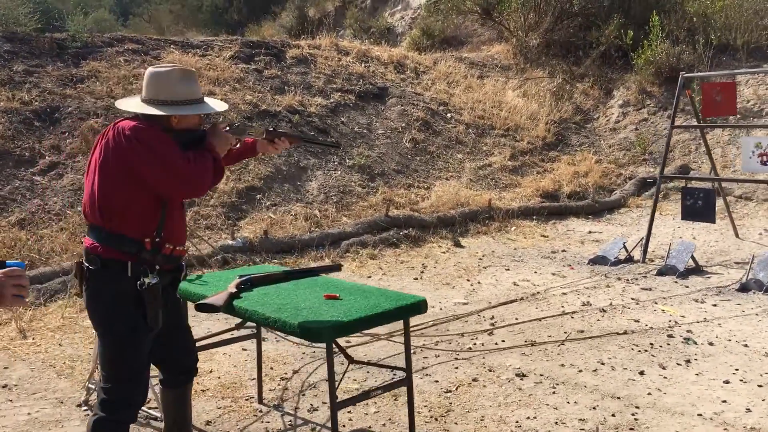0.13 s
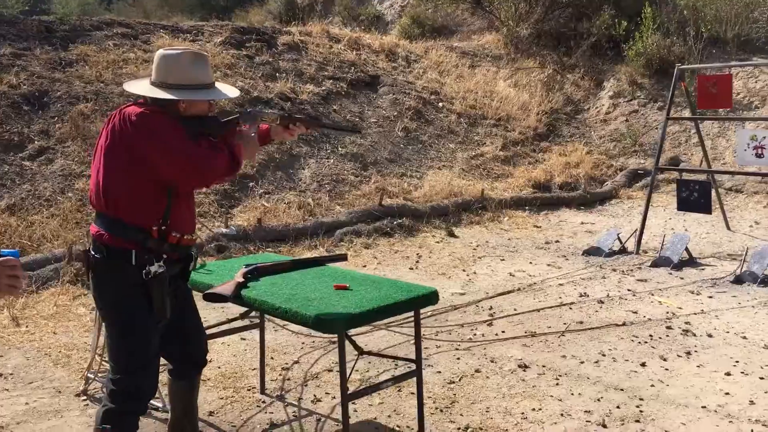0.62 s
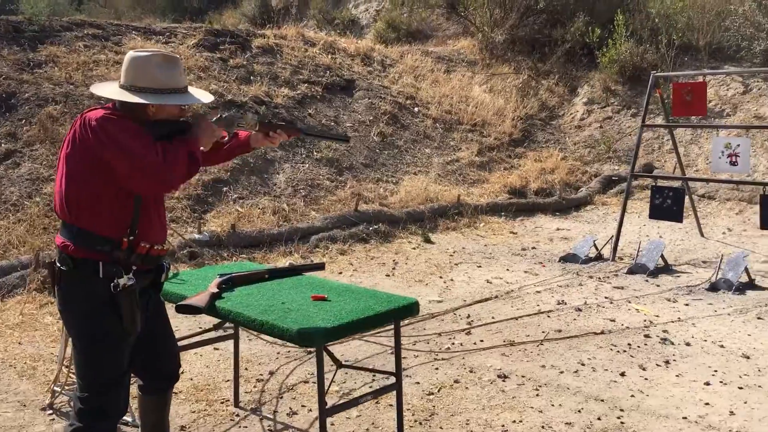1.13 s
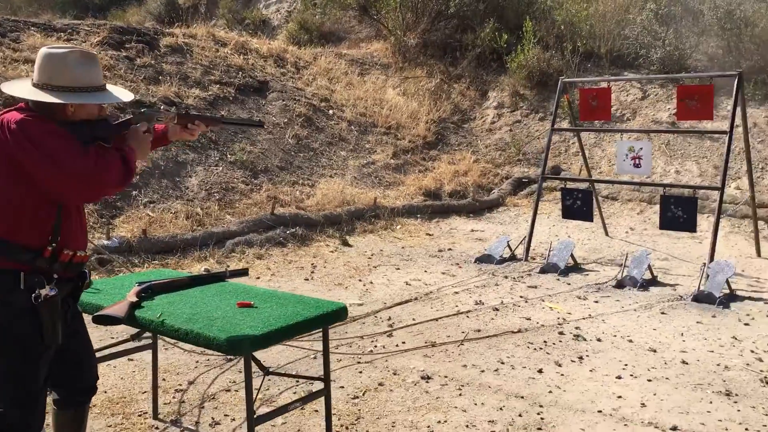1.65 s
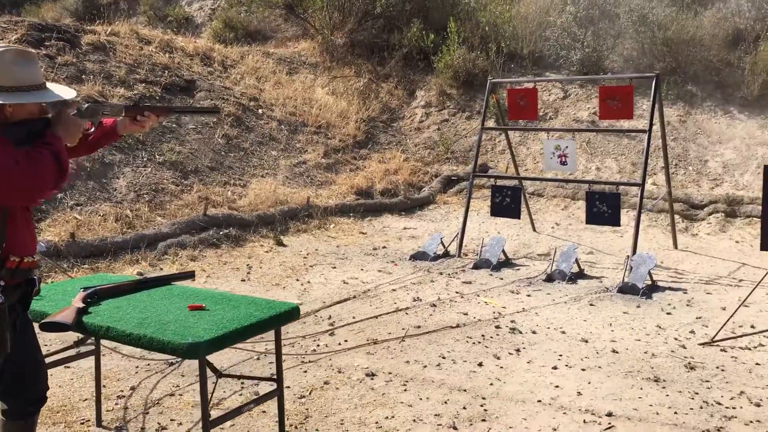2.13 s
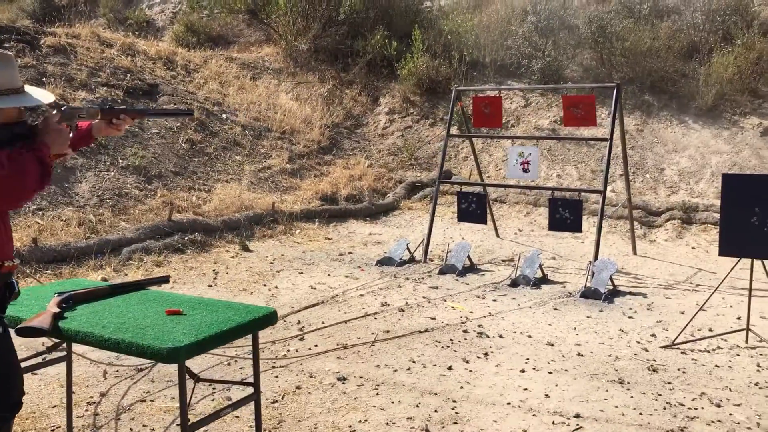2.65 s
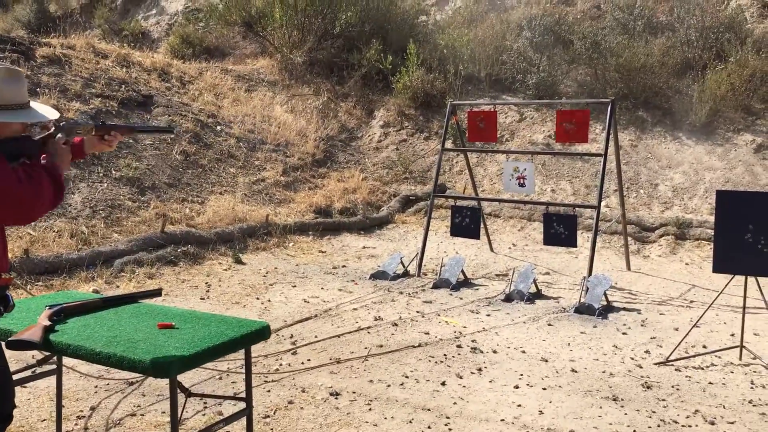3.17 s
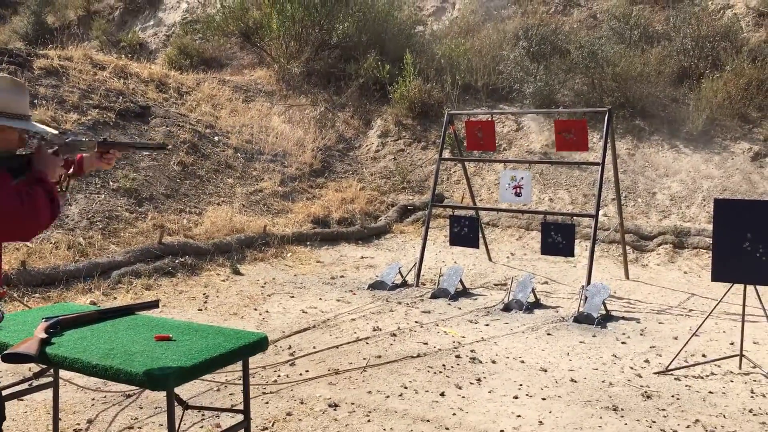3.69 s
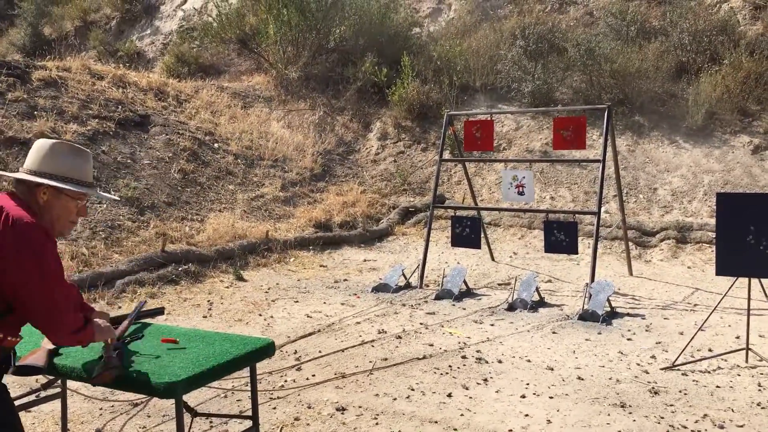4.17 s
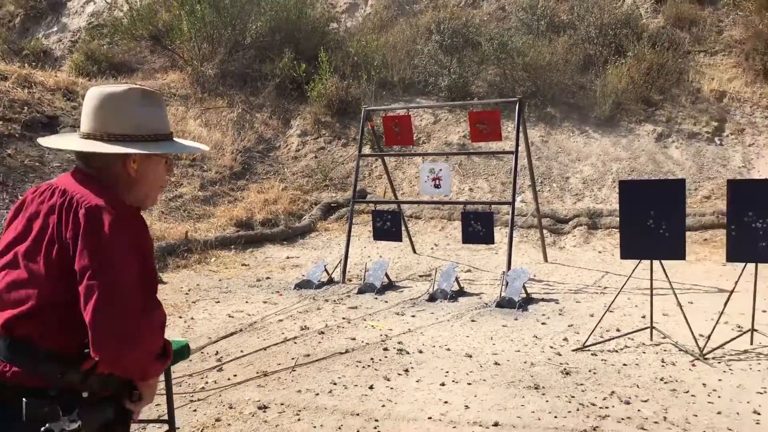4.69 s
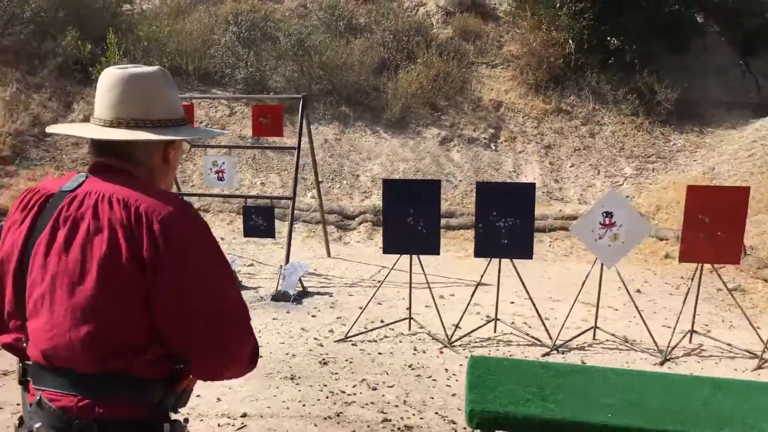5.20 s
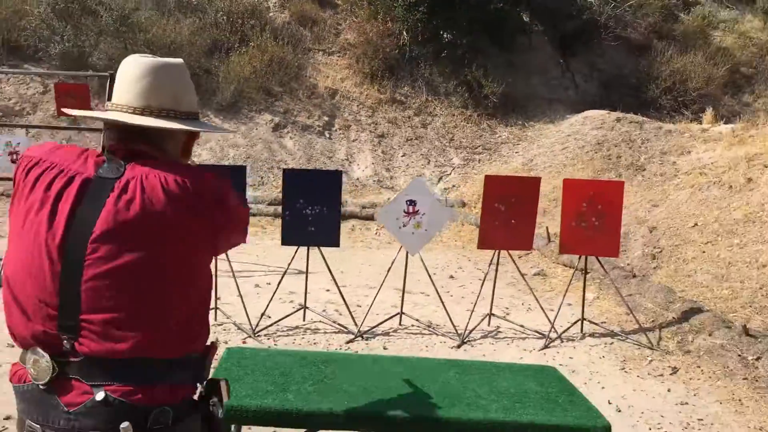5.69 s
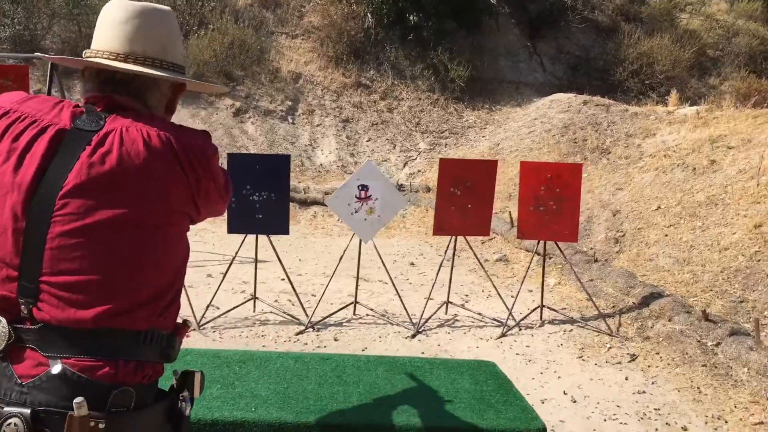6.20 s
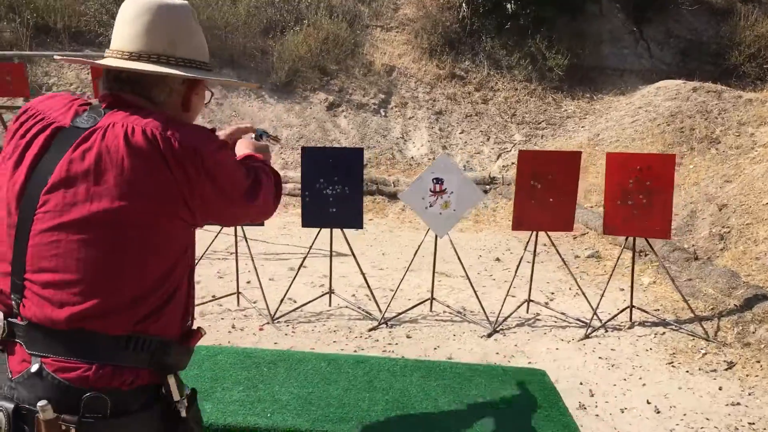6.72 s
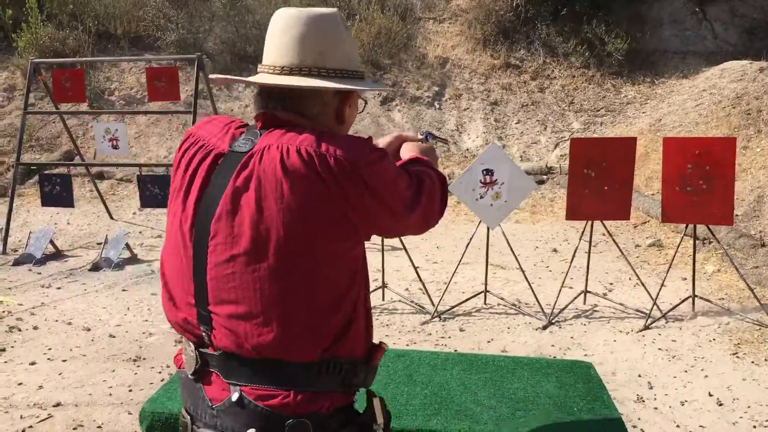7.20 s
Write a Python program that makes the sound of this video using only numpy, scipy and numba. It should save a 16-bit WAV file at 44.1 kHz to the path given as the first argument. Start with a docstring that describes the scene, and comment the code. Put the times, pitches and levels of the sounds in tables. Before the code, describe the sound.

At an open range, fast rifle bangs and metallic clangs give way to a gun set down, gear clinks, and five sharp revolver shots.

```python
"""Ten quick lever-rifle shots crack out, the rifle thumps down on a table, then a revolver fires five.
Most shots are answered by clanging steel plates, nearer ones for the revolver: decaying modes and a noise splatter.
Each blast is a sharp front and a low swing, slapped back by table, ground and earth banks as bursts of noise and tone.
Between them: filtered steel rattles, knocks, chinks, cloth, and light wind as coloured noise on the microphone.
The microphone's gain control ducks under every bang and creeps back."""
import sys
import numpy as np
from scipy import signal
from scipy.fft import rfft, irfft, next_fast_len
from scipy.io import wavfile
from scipy.ndimage import uniform_filter1d, minimum_filter1d, map_coordinates
from numba import njit

SR = 44100
rng = np.random.default_rng(int(sys.argv[2]) if len(sys.argv) > 2 else 0)


def ratio_of_db(decibels):
    """Turn decibels (scalar or array-like) into linear amplitude factors; 0 dB maps to 1."""
    return 10 ** (np.asarray(decibels, float) / 20)


def transcribe(signal):
    """Save signal, clipped to [-1, 1], as a 16-bit WAV file at the path in sys.argv[1]."""
    frames = np.atleast_2d(signal).T
    limited = np.clip(frames, -1, 1)
    pcm = np.round(limited * 32767).astype(np.int16)
    wavfile.write(sys.argv[1], SR, pcm)


N = 323683

# wind on the microphone: t/s, level/dB
WIND_LEVEL = [(0, -31), (.25, -35), (.5, -56), (2.1, -50), (2.65, -28.5), (2.9, -60), (3.9, -46.5),
              (4.9, -39), (5.08, -31), (5.4, -42)]
# colour of the buffeting: f/Hz, relative level/dB per Hz
WIND_COLOUR = [(20, -2.5), (65, 9), (265, -4), (500, -28.5)]
# colour of grit, cloth and outdoor hiss: f/Hz, relative level/dB per Hz
GRIT_COLOUR = [(180, -55), (280, 0), (480, -9), (1300, -11), (3520, -13), (15900, -27)]
# cloth and steps: t/s, level/dB
RUSTLE_LEVEL = [(4.2, -59), (4.35, -38), (4.7, -52.5), (6.05, -49), (6.2, -63)]
# rifle on the table, steps and belt gear: t/s, relative level/dB, knock f/Hz, t60/s
GEAR_KNOCKS = [(4.2329, -1, 220, 0.061), (4.237, -19, 2640, 0.37), (4.262, -18.5, 250, 0.57),
               (4.493, -24.5, 2560, 0.12), (4.587, -22.5, 960, 0.14), (4.783, -24, 230, 0.11),
               (4.893, -27.5, 1180, 0.036), (1.192, -26, 693, .06), (5.125, -29.5, 895, 0.038),
               (5.291, -33.5, 1440, 0.28), (5.3, -18, 3300, 0.017), (5.317, -29, 790, 0.22),
               (5.609, -24, 3670, 0.023), (5.622, -25.5, 5330, 0.1), (5.655, -18.5, 246, 0.054),
               (6.008, -32, 2050, 0.55), (6.044, -30.5, 2700, 0.5)]
# buckles and cartridges: t/s, level/dB, ring f/Hz
METAL_CHINKS = [(4.15, -29.5, 900), (4.195, -35.5, 3240), (4.798, -27, 4460), (4.8585, -23.5, 4310),
                (4.989, -41.5, 10900), (5.0215, -29, 9530), (5.2364, -23.5, 4310), (5.4057, -22.5, 11220),
                (5.5153, -29, 1510)]
# lever, hammer and cases: t/s, relative level/dB
ACTION_CLICKS = [(0.0973, -20.5), (0.129, -10.5), (0.167, -10.5), (0.198, -15.5), (0.236, -33),
                 (0.852, -25), (0.3001, -23.5), (0.8822, -16.5), (0.9255, -21.5), (1.6027, -21),
                 (1.6324, -25.5), (2.228, -20), (2.2633, -20), (3.0023, -23.5), (3.4459, -15.5),
                 (3.46, -11), (7.222, -35)]
# resonances of the rifle's steel: f/Hz, width/Hz, relative level/dB
RECEIVER_MODES = [(2300, 1400, -13), (6670, 350, -2.5), (7300, 76, -8)]
# modes of each plate: f/Hz, then nominal level/dB a tenth of a second after each strike in turn
# (every point of impact favours other modes)
PLATE_MODES = { "a": [(424, -36, -46), (1165, -39.5, -24.5), (1930, -43, -40.5), (2840, -41.5, -33),
               (3090, -25, -22.5), (3962, -23.5, -15), (5200, -35, -32.5), (6550, -44, -25)],
               "b": [(1186, -27.5, -33), (3140, -34.5, -38.5), (3973, -34, -23.5)], "c": [(1152, -38, -35),
               (3978, -39, -33.5), (5120, -45, -50.5), (5400, -41.5, -34.5), (8270, -47.5, -31.5),
               (11719, -48.5, -67.5)], "d": [(1168, -22, -36.5), (2000, -51, -36.5), (2512, -41, -34.5),
               (2740, -42, -46), (4000, -38.5, -32), (6660, -41.5, -36), (9940, -41.5, -47.5)],
               "e": [(1190, -41, ), (3962, -21.5, ), (7558, -43.5, ), (8333, -39, )], "f": [(604, -17.5),
               (709, -31.5), (870, -27.5), (1027, -31), (1252, -27), (1965, -26.5), (2238, -28),
               (2501, -18), (3276, -23), (4469, -22.5), (4817, -20), (5354, -19), (5582, -23.5),
               (6044, -23), (6259, -13.5), (7531, -18), (8340, -16.5)], "g": [(598, -27.5), (1382, -39.5),
               (2242, -34.5), (2840, -29), (3884, -48.5), (5122, -28), (6037, -31), (6382, -42),
               (7934, -32), (8236, -21.5), (9134, -25.5), (10075, -28), (11637, -30), (13021, -40),
               (14503, -34)], "h": [(597.5, -31), (748.3, -37.5), (1233, -29), (1346, -38.5), (3801, -36.5),
               (6282, -40.5)]}
# plate modes that hang on far longer than the rest: f/Hz, t60/s
LASTING_MODES = [(1189, 1.07), (2508, 0.77), (3970, 0.75)]
# bullet strikes: t/s, plate, splatter relative level/dB, low swing level/dB
BULLET_STRIKES = [(0.3671, "a", -0.5, -15), (0.6289, "a", -4.5, -12.5), (1.0395, "b", -0.5, 7.5),
                  (1.2957, "b", -1.5, -29), (1.6955, "c", -1, 10), (1.969, "c", 2.5, -18),
                  (2.4568, "d", -5.5, -1.5), (2.7225, "d", -5.5, 1), (3.5593, "e", 1.5, 9),
                  (6.122, "f", 10, 0), (6.662, "g", 0.5, 11), (7.014, "h", -3, -10)]
# colour of the dull return: f/Hz, relative level/dB per Hz
DULL_COLOUR = [(150, -26.5), (520, 0), (1030, -6.5), (5000, -16.5), (9000, -60)]
# colour of the bright return: f/Hz, relative level/dB per Hz
BRIGHT_COLOUR = [(880, 4.5), (1500, -3), (5660, 0.5), (15100, -9), (15900, -21.5)]
# single slaps from surfaces near the rifle: delay after the shot t/s, level/dB relative to the blast,
# nominal f/Hz, time to peak t/s, relative width (also the share of noise against tone)
RIFLE_ECHOES = [(.0038, -5.5, 2500, .0005, .7), (.0205, 2, 800, 0.0011, 0.96),
                (0.0304, 5, 1013, 0.0017, 0.74)]
# the same for the revolver: delay t/s, relative level/dB, nominal f/Hz, time to peak t/s, relative width
REVOLVER_ECHOES = [(.005, 1.2, 1606, .004, 1), (.021, 5.3, 890, 0.0024, 1)]
# rifle shots: t/s, low swing level/dB, swing stretch (factor on its time)
RIFLE_SHOTS = [(.3198, 10.5, 1.3), (.5847, 8.5, 1.04), (.9997, 0.5, 1.04), (1.2527, 13.5, 0.5),
               (1.6567, 13, 1.04), (1.9266, 10, 0.56), (2.415, 11, 1.25), (2.6789, 12, 0.95),
               (3.1818, 9.5, 1.25), (3.516, 10.5, 1.22)]
# revolver shots: t/s, low swing level/dB, swing stretch (factor on its time)
REVOLVER_SHOTS = [(6.0927, 14.8, 0.48), (6.2483, 12.2, 0.92), (6.6329, 14, 0.6), (6.9846, 12.4, 0.44),
                  (7.3288, 4.8, 0.55)]
PAIRED_SHOTS = RIFLE_SHOTS[1:8:2]  # the quick second shot of each pair


def unit(x):
    """Scaled to rms 1."""
    return x / np.sqrt(np.mean(x ** 2) + 1e-20)


def noise(points, size):
    """Noise of rms 1 coloured by (Hz, dB) points on a log frequency axis."""
    hz, db = np.transpose(points)
    padded = next_fast_len(size)
    log_hz = np.log(np.fft.rfftfreq(padded, 1 / SR) + 1)
    gain = ratio_of_db(np.interp(log_hz, np.log(hz), db, -120, -120))
    return unit(irfft(rfft(rng.standard_normal(padded)) * gain, padded)[:size])


def band(size, hz, width):
    """Noise of rms 1 around one frequency, with a relative width."""
    points = [(hz / 8, -60), (hz / (1 + width), -9), (hz, 0), (hz * (1 + width), -9), (hz * 8, -45)]
    return noise(points, size)


def curve(rows):
    """(s, dB) rows as one dB value per sample."""
    s, db = np.transpose(rows)
    return np.interp(np.arange(N) / SR, s, db, -120, db[-1])


def wobble(rate, size=N):
    """A smooth random curve, rate knots a second."""
    knots = rng.standard_normal(int(size * rate / SR) + 4)
    return map_coordinates(knots, [np.arange(size) * rate / SR])


def add(out, s, x):
    """Mixes x into out from time s."""
    i = round(s * SR)
    out[i:i + len(x)] += x[:max(len(out) - i, 0)]


def wind():
    """Lumpy buffeting on the microphone port over a faint outdoor hiss."""
    lumps = ratio_of_db(6 * wobble(13))
    buffeting = unit(lumps * noise(WIND_COLOUR, N))
    hiss = ratio_of_db(-56.0 + 2.0 * wobble(1.2)) * noise(GRIT_COLOUR, N)
    return ratio_of_db(curve(WIND_LEVEL)) * buffeting + hiss


def rustle():
    """Cloth and steps: flickering gritty noise over a hollow low undertone."""
    cloth = unit(ratio_of_db(3 * wobble(25) + 6 * wobble(300)) * noise(GRIT_COLOUR, N))
    rumble = ratio_of_db(-4.5 + 5.7 * wobble(13)) * band(N, 260, width=0.27)
    return ratio_of_db(curve(RUSTLE_LEVEL)) * (cloth + rumble)


def gear():
    """Contacts knock at their own pitch over a gritty scrape; small metal parts clatter as short rings."""
    out, t = np.zeros(N), np.arange(SR // 3) / SR
    for s, db, hz, t60 in GEAR_KNOCKS:
        uneven = ratio_of_db(3.5 * wobble(250, len(t)))
        if hz < 250:  # the table top and boots thump on one low note
            knock = 2 * np.sin(2 * np.pi * hz * t)
        else:
            knock = band(len(t), hz, width=0.99)
        envelope = ratio_of_db(db - 60 * t / t60) * (1 - np.exp(-t * hz)) * uneven
        add(out, s, envelope * (ratio_of_db(-5.5) * knock + ratio_of_db(-8.5) * noise(GRIT_COLOUR, len(t))))
    for s, db, hz in METAL_CHINKS:
        ring = np.sin(2 * np.pi * hz * t) + ratio_of_db(-7) * band(len(t), hz, width=0.74)
        add(out, s, ratio_of_db(db - 60 * t / 0.024) * ring)
    return out


def action():
    """Short bursts of noise rattle the rifle's steel through the resonances of the receiver."""
    rattle, t = np.zeros(N), np.arange(SR // 5) / SR
    # the lever slams shut 23 ms before the second shot of each pair
    slams = [(shot[0] - 0.023, -11.5) for shot in PAIRED_SHOTS]
    for s, db in ACTION_CLICKS + slams:
        envelope = ratio_of_db(db - 60 * t / 0.086) * (1 - np.exp(-t / 0.0002))
        add(rattle, s, envelope * rng.standard_normal(len(t)))
    f = np.fft.rfftfreq(N, 1 / SR)
    steel = 0.15
    for k, (hz, width, db) in enumerate(RECEIVER_MODES):
        resonance = 1j * f * width / (hz * hz - f * f + 1j * f * width)
        steel = steel + (-1) ** k * ratio_of_db(db) * resonance
    tilt = f / (f + 900) * (f < 15900)
    return ratio_of_db(9.5) * irfft(rfft(rattle) * steel * tilt, N)


def swing(t, stretch):
    """The diaphragm overshoots: a swing that slows from a snap down to a low thump."""
    u = t / stretch
    cycles = 47 * u + 0.36 * np.log(1 + u / 0.00064)
    return np.sin(2 * np.pi * cycles) * (1.3 - np.exp(-u / 0.0052)) * np.exp(-u / 0.011)


def plate_ring(t, plate, visit, splat_db):
    """A struck plate rings in decaying modes, each at a slightly new strength."""
    hz, *by_strike = np.transpose(PLATE_MODES[plate])[..., None]
    level_db = by_strike[visit]
    # many weaker modes ring too, others at each point of impact
    weak = rng.random((2, 48, 1))
    top_db, spread_db = (-34, 6) if plate in "fg" else (-45, 22)
    hz = np.vstack([hz, 1000 + 14000 * weak[0]])
    level_db = np.vstack([level_db, top_db - spread_db * weak[0] - 10 * weak[1]])
    # high modes radiate their energy sooner
    t60_1khz, slope = (2.6, -.8) if plate in "fgh" else (.6, -.55)  # the nearer plates are f, g, h
    t60 = t60_1khz * (hz / 1000) ** slope
    # a weak share of each mode fades 16 times slower
    linger = ratio_of_db(-30.5 - 60 * t / (16 * t60))
    for tone_hz, lasting in LASTING_MODES:
        t60 = np.where(abs(hz / tone_hz - 1) < .004, lasting, t60)
    luck = rng.standard_normal((4, len(hz), 1))
    # nearly square plates split each mode into a close pair, which beats
    beat = 1 + .3 * np.cos(2 * np.pi * (5 * luck[2] * t + luck[3]))
    # the treble is fiercest around the fresh dent
    flash_db = 1.24 * min(ratio_of_db(splat_db), 1) * hz / 1000 * np.exp(-t / 0.037)
    fade = ratio_of_db(flash_db - 60 * (t - .1) / t60) + linger
    tones = np.sin(2 * np.pi * hz * t + 3 * luck[1])
    ring = (ratio_of_db(level_db + 1.5 * luck[0]) * fade * beat * tones).sum(axis=0)
    return ring * (1 - np.exp(-t / 0.0022))


def plates():
    """Each bullet splatters as bright noise, swings the diaphragm and sets the plate ringing."""
    out, t = np.zeros(N), np.arange(int(1.5 * SR)) / SR
    struck = []
    for s, plate, splat_db, swing_db in BULLET_STRIKES:
        ring = plate_ring(t, plate, struck.count(plate), splat_db)
        struck.append(plate)
        splat = (ratio_of_db(5 - 60 * t / 0.09) + ratio_of_db(-0.5 - 60 * t / 0.014)) * noise(BRIGHT_COLOUR, len(t))
        add(out, s, ring + ratio_of_db(splat_db) * splat + ratio_of_db(swing_db) * swing(t, 0.85))
    return out


def scatter(t, near_db, near_t60, bank_db, valley_db, valley_t60, far_db):
    """Envelope of the return: fast decay off close ground, a shelf that ends with the far bank, a valley tail."""
    bank_end = 1 + np.exp(np.clip((t - .14) / 0.0076, -50, 50))
    shelf = ratio_of_db(bank_db - 44.5 * t) / bank_end
    far = shelf + ratio_of_db(valley_db - 60 * t / valley_t60)
    return ratio_of_db(near_db - 60 * t / near_t60) + ratio_of_db(far_db) * far


def blast(t, far_db):
    """Sharp pressure front, then its scattered return as dull and bright noise."""
    # rocks and scrub return the bang in lumps
    uneven = ratio_of_db(3 * wobble(90, len(t)) + 4.5 * wobble(900, len(t)))
    front = (1 - t / 0.00028) * np.exp(-t / 0.0001)
    dull = scatter(t, near_db=-1, near_t60=0.15, bank_db=-26, valley_db=-52, valley_t60=2.5, far_db=far_db)
    bright = scatter(t, near_db=-1.5, near_t60=0.11, bank_db=-20.5, valley_db=-30, valley_t60=0.85,
                     far_db=far_db)
    return front + uneven * (dull * noise(DULL_COLOUR, len(t)) + bright * noise(BRIGHT_COLOUR, len(t)))


def slap(t, db, hz, length, width):
    """One nearby surface returns a short swell of banded noise and tone."""
    # each new aim shifts the strength of the slap and the colour of its noise
    aim = rng.standard_normal(2)
    u = t / length
    hiss = width * band(len(t), hz * 1.12 ** aim[1], width)
    tone = 2 * (1 - width) * np.sin(2 * np.pi * hz * t)
    return ratio_of_db(db + 1.5 * aim[0]) * u * np.exp(1 - u) * (hiss + tone)


def gun(shots, slaps, db, far_db, lead_s, turn_db):
    """Each shot: a hiss just ahead, the blast, a low swing with the push of the gas, and distinct slaps."""
    out, t = np.zeros(N), np.arange(int(.6 * SR)) / SR
    for s, swing_db, stretch in shots:
        push = ratio_of_db(-17.5 - 60 * t / 0.18) * np.sin(2 * np.pi * 52 * t)  # low push of the gas
        add(out, s, ratio_of_db(db) * blast(t, far_db) + ratio_of_db(swing_db) * (swing(t, stretch) + push))
        # the bullet leaves just ahead of the gas
        envelope = ratio_of_db(db - 6 - 60 * t / 0.19) * (1 - np.exp(-t / 0.0021))
        add(out, s - lead_s, envelope * noise(BRIGHT_COLOUR, len(t)))
        # slaps change by turn_db each second as the microphone turns to the bank
        turned_db = db + turn_db * (s - 2)
        for delay, level_db, hz, length, width in slaps:
            add(out, s + delay, slap(t[:2600], turned_db + level_db, hz, length, width))
    return out


def scene():
    """Everything that reaches the microphone."""
    background = wind() + rustle() + gear() + action()
    rifle = gun(RIFLE_SHOTS, RIFLE_ECHOES, db=-1.5, far_db=-0.5, lead_s=0.0037, turn_db=1.5)
    revolver = gun(REVOLVER_SHOTS, REVOLVER_ECHOES, db=1.5, far_db=-3.5, lead_s=0.0025, turn_db=0)
    return (background + plates() + rifle + revolver)[None]


@njit
def ducking(need_db, back):
    """Gain in dB falls at once to what is needed and creeps back."""
    gain_db = np.zeros(len(need_db))
    for i in range(1, len(need_db)):
        gain_db[i] = min(need_db[i], gain_db[i - 1] * back)
    return gain_db


def gain_control(x):
    """Holds the short-term level to -7 dB with a little look-ahead; recovers over a 0.25 s time constant."""
    power = np.abs(uniform_filter1d(x[0] ** 2, size=88))  # 2 ms window
    need_db = np.minimum(0, -7 - 10 * np.log10(power + 1e-12))
    ahead_db = minimum_filter1d(need_db, size=133)  # 1.5 ms to either side
    gain_db = ducking(ahead_db, np.exp(-1 / (.25 * SR)))
    return x * ratio_of_db(uniform_filter1d(gain_db, size=88))


def top_cut(x):
    """Nothing passes above the cut-off."""
    return signal.sosfilt(signal.butter(12, 16990, fs=SR, output="sos"), x)


def record(dry):
    """The microphone's gain control, then soft clipping."""
    ducked = gain_control(dry)
    mix = ducked / (1 + np.abs(ducked / .97) ** 5) ** (1 / 5)
    return top_cut(mix)


dry = scene()
out = record(dry)
transcribe(out)
```